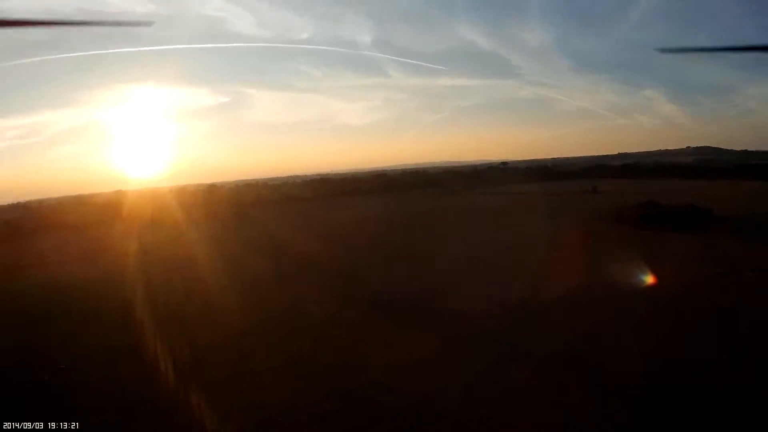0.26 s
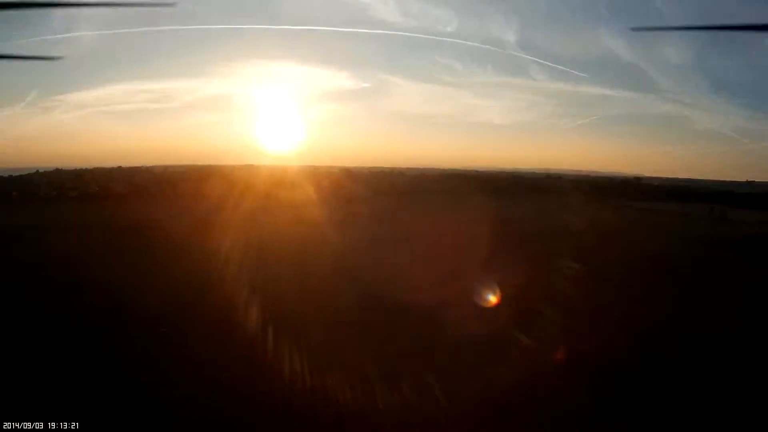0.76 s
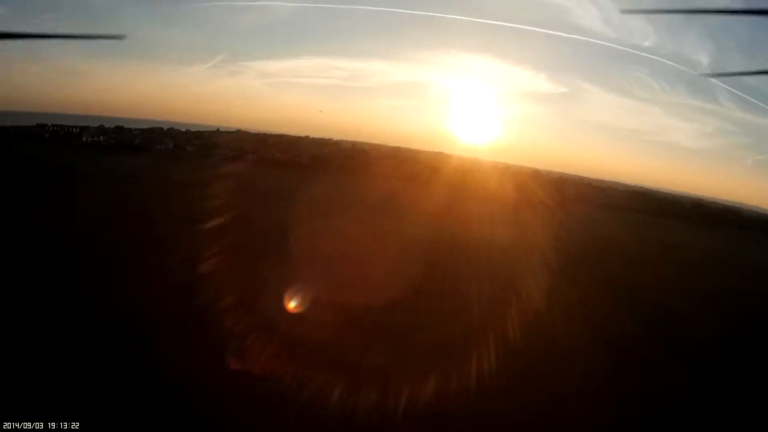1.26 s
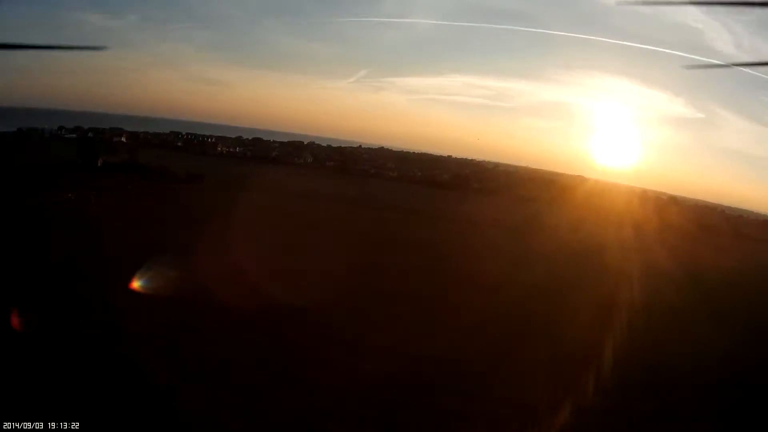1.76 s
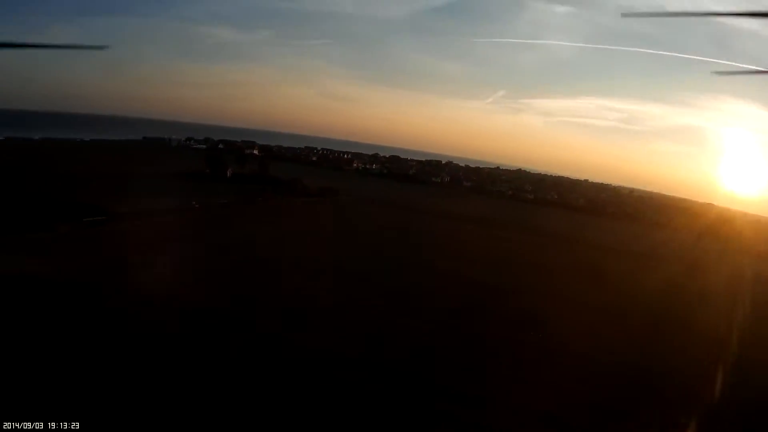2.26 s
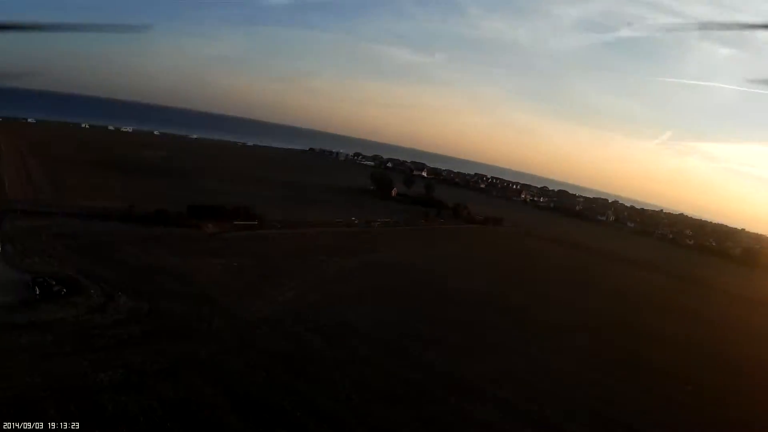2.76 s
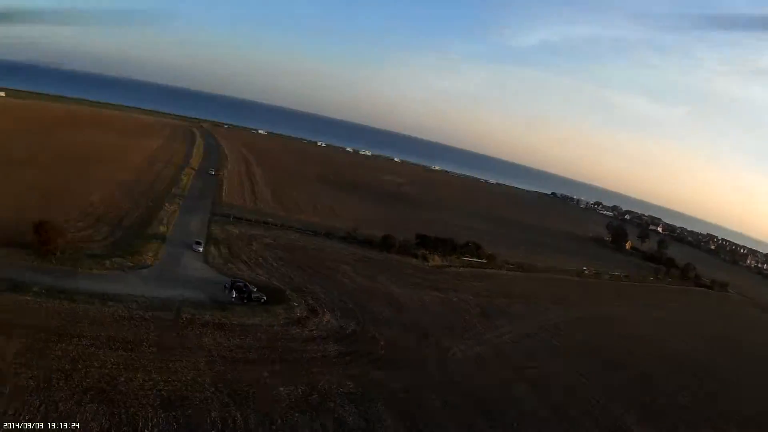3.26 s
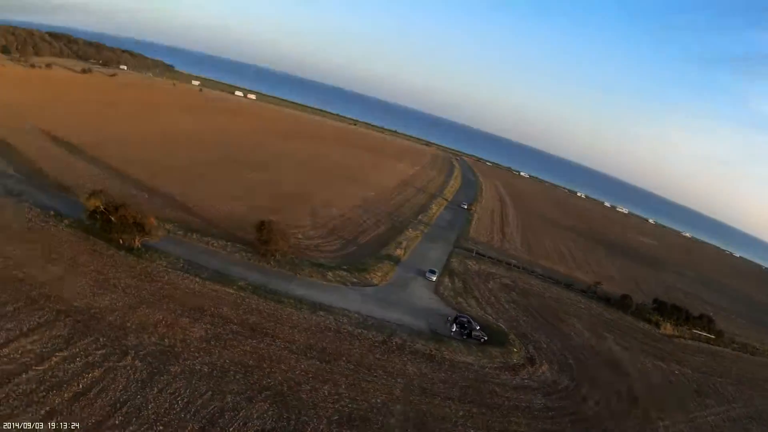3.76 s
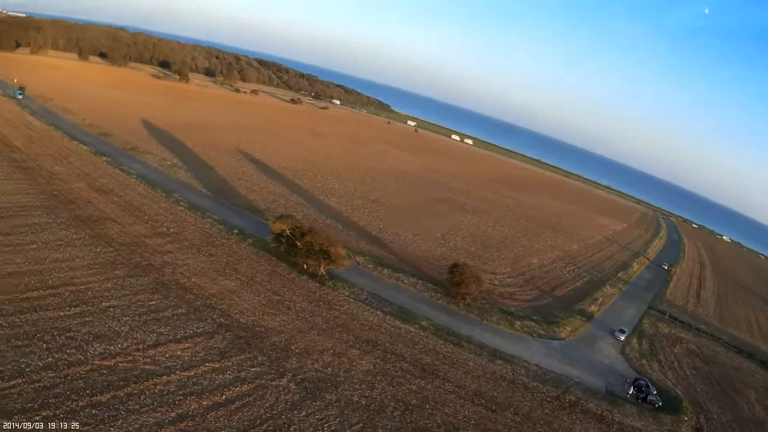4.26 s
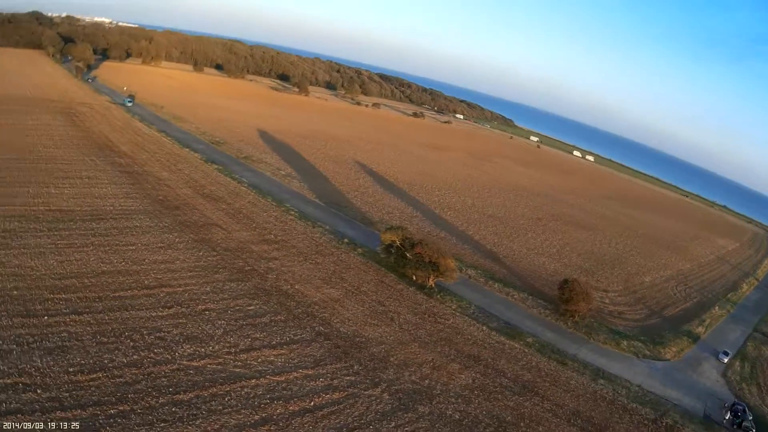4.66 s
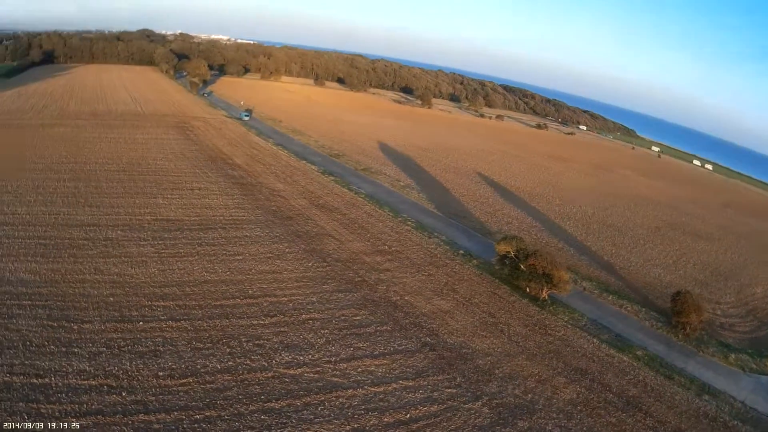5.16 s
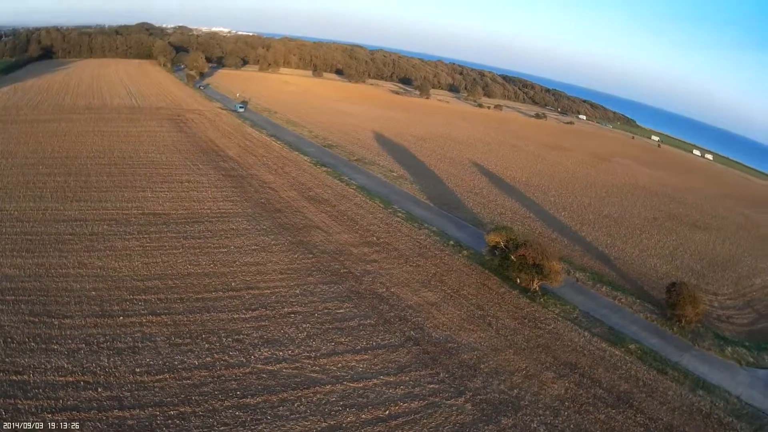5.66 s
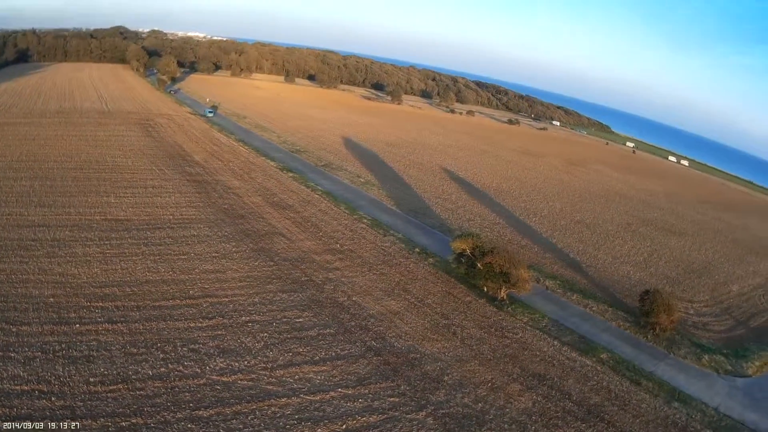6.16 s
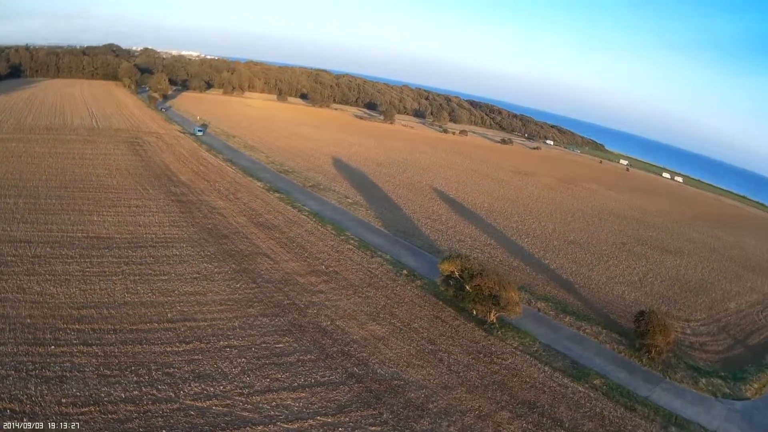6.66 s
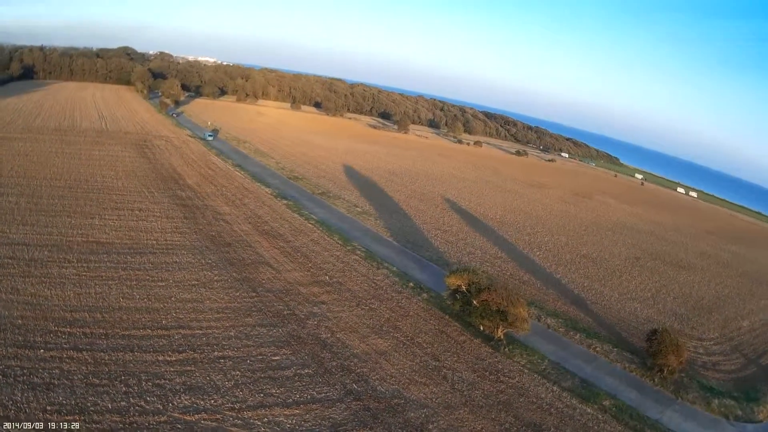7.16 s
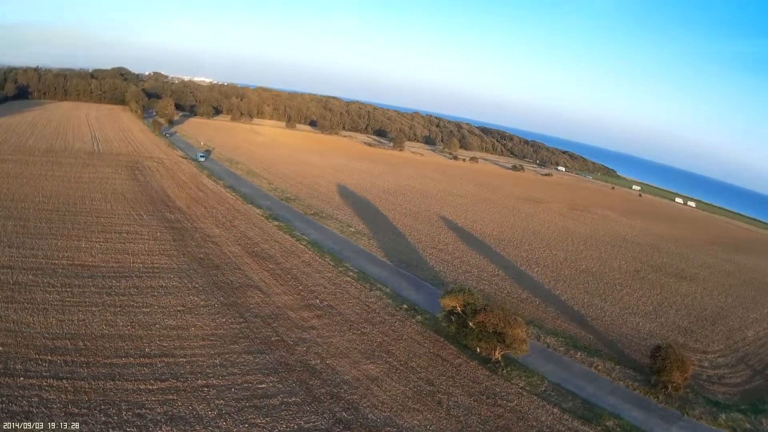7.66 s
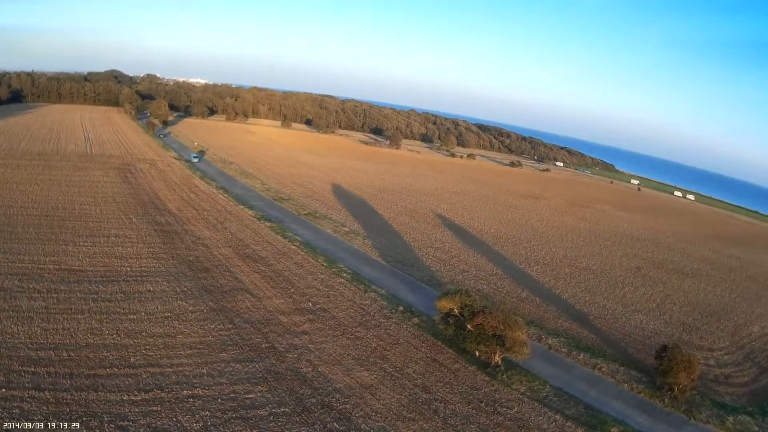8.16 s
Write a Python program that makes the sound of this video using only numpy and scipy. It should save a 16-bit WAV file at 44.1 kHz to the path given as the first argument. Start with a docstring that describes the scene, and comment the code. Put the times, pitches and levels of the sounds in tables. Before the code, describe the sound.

A small drone's propellers hum low and beat under a thin electric whine, harsh blade slapping first, then smoother, finally shaking hard and overloading the microphone.

```python
"""Over open fields, a small quadcopter banks; we hear it through the camera microphone on its frame.
Four motors run at slightly different speeds: tones locked to each shaft make a low propeller hum that
beats, and a magnetic whine near 4 kHz. Shaped noise makes the rushing air, the low buffeting and the hiss.
Short pulses make the blade slaps, the buzz and the ticks; thin whistles come and go.
Later on, the frame shakes hard once a revolution and overloads the microphone."""
import sys
import numpy as np
from scipy import signal
from scipy.fft import rfft, irfft
from scipy.io import wavfile

SR = 44100
rng = np.random.default_rng(int(sys.argv[2]) if len(sys.argv) > 2 else 0)


def wrap_up_sound(samples):
    """Save the sound to the file named by the first command line argument, as 16-bit audio."""
    columns = np.atleast_2d(samples).T
    # keep every value between -1 and 1, then stretch to whole-number steps
    tamed = np.clip(columns, -1, 1)
    steps = np.round(tamed * 32767).astype(np.int16)
    wavfile.write(sys.argv[1], SR, steps)


N = 370440
TIME = np.arange(N) / SR  # seconds

# set speeds of the two motors nearest the microphone: (time [s], shaft speed [turns per s])
SPEED_A = [(0.0, 90.0), (0.38, 94.7), (0.65, 88.8), (0.79, 95.3), (1.0, 91.3), (1.22, 90.9), (1.3, 95.0),
           (2.1, 97.3), (2.65, 103.7), (2.9, 104.1), (3.45, 96.3), (3.58, 100.3), (4.14, 102.4),
           (4.73, 94.4), (5.36, 100.7), (6.07, 90.5), (6.33, 93.2), (6.8, 90.6), (7.22, 94.3), (7.67, 94.0),
           (8.07, 88.2), (8.4, 90.5)]
SPEED_B = [(0.0, 84.1), (0.19, 81.1), (0.9, 79.3), (1.01, 81.6), (2.31, 88.0), (2.79, 87.6), (3.28, 93.2),
           (3.4, 97.5), (3.56, 94.2), (4.37, 91.7), (4.53, 96.6), (4.95, 92.1), (5.1, 94.2), (5.2, 85.1),
           (5.39, 84.3), (5.55, 87.7), (6.47, 93.3), (7.03, 86.3), (7.24, 89.7), (7.38, 86.4), (7.67, 88.0),
           (8.4, 86.1)]
# set speeds of the two far motors: (time [s], shaft speed [turns per s])
SPEED_C = [(0, 92.9), (.95, 90.8), (1.32, 78.5), (2.2, 89), (3.1, 90), (3.501, 93.4), (3.87, 90.9),
           (4.45, 98.7), (5.1, 98.85), (6.4, 90.26), (7.15, 90.9), (7.55, 98), (7.85, 93.3), (8.4, 94)]
SPEED_D = [(0, 95.7), (1.401, 96.6), (2.2, 91), (2.7, 94.7), (3.45, 96), (4.75, 105.3), (5.65, 99.6),
           (6.35, 104.9), (8.4, 100.3)]
# the speeds hunt around these settings: rate and filter width of the hunting
HUNT_HZ, HUNT_WIDTH_HZ = 5.5, 4.95
# typical swing of the shaft angle: a fixed part, and a part per unit of sway gain
HUNT_RAD, HUNT_SWAY_RAD = .025, .15

# base strength of the near motors: (time [s], whine [dB], propeller hum [dB])
LEVEL_A = [(0, -40, -16.5), (.65, -37, -16.5), (1.1, -40, -18), (1.6, -42, -16.5), (2.3, -31, -16),
           (3.25, -30, -15), (3.55, -38.5, -17), (4.7, -40.5, -20.5), (5.5, -42, -19.5), (6.2, -39, -20.5),
           (8.4, -39, -21.5)]
LEVEL_B = [(0, -45, -32), (1.6, -46, -32), (2.4, -57, -22.5), (3.8, -36, -19), (4.7, -43, -19),
           (5.25, -33.5, -27.5), (6.3, -39.5, -20.5), (6.75, -34.5, -31.5), (8.4, -37, -14.5)]
# propeller hum; two blades make the even multiples strong: (multiple of shaft speed, level [dB])
HUM = [(1, -9), (2, 1.5), (3, -18), (4, -9.5), (5, -24.5), (6, -20.5), (7, -34), (8, -32)]

# motor whine; 14 poles are switched 42 times a turn: (multiple of shaft speed, level [dB])
WHINE = [(36, -29), (40, -29), (42, 0.5), (44, -17)]
STEPS_PER_TURN = 42
FAR_WHINE_C_DB, FAR_WHINE_D_DB = -40, -42.5
# a whine grows louder as it passes this resonance of the frame
FRAME_HZ, FRAME_WIDTH_HZ, FRAME_DB = 3714, 330, 6.5

# stretches of disturbed air at the blades: (start [s], attack [s], hold [s], release [s], level [dB])
WAKES = [(0, .02, 3.42, 0.1, -2), (1.75, 0.48, 0.23, 0.42, -6.5), (3.44, 0.077, 0.53, 0.33, -13)]
# slap pulses and noise puffs at a reference shaft speed, and their change for each Hz above it
SLAP_SPEED_HZ = 100
PULSE_DB, PULSE_DB_PER_HZ = -30.5, 0.46
PUFF_DB, PUFF_DB_PER_HZ = -31, -0.13
# tone colours of the slap pulses and the puffs: (frequency [Hz], relative level [dB])
SLAP_COLOUR = [(400, 0), (800, -4), (1250, -1), (1700, 3), (2050, -0.5), (2450, -21), (3500, -27),
               (8000, -34)]
PUFF_COLOUR = [(400, -28), (900, -5), (1500, 1), (2100, 3), (2600, -5.5), (3500, -32), (8000, -42)]

# bouts of frame sway: (start [s], attack [s], hold [s], release [s], level [dB])
SWAYS = [(5.6, 0.34, 2.1, 0.14, -20), (6.14, 0.18, 0.67, 0.37, -8), (7.52, .16, 0.42, .45, -11)]
CALM_SWAY_DB = -25  # always present, under the bouts
# knocking of the frame: (multiple of shaft speed, level [dB])
KNOCK = [(2, -8.5), (3, -1), (4, -10), (5, -8.5), (6, -30.5), (7, -22)]
# knocking per unit of sway gain and of gust gain
SWAY_KNOCK_DB, GUST_KNOCK_DB = -17, -12.5

# bouts of chatter in the mount: (start [s], attack [s], hold [s], release [s], level [dB])
CHATTERS = [(0, .02, 1.8, .6, -33), (3.5, 0.1, 0.25, 1.4, -45), (5, .04, 0.011, .04, -32),
            (4.68, 0.026, 0.025, 0.066, -31.5), (5.0, 1, 2.5, 0.19, -38)]
BUZZ_DB = -48.5  # steady buzz under the bouts
# bouts of fine ticking in the mount: (start [s], attack [s], hold [s], release [s], level [dB])
TICKS = [(2.3, 0.47, .5, .8, -48), (4.9, 0.53, 2.58, 0.23, -46.5), (6.6, .25, .3, .3, -46)]

# hiss of the blade tips in calm air, and its rise per unit of wake gain and of gust gain
HISS_DB, HISS_WAKE_DB, HISS_GUST_DB = -31, 2.5, 2
# tone colour of the hiss: (frequency [Hz], relative level [dB])
HISS_COLOUR = [(200, -10), (900, -6.5), (2200, 0.5), (3200, -3.5), (3900, 5.5), (4500, 0.5), (5300, -8),
               (6700, -13.5), (7800, -10.5), (10500, -20), (13500, -22), (15500, -29)]
# resonances of the camera housing: (frequency [Hz], width [Hz], height [dB])
HOUSING = [(4600, 180, 3), (6010, 740, 4.5), (9870, 880, 7), (12000, 720, 5)]

# brief thin whistles above the whine: (middle [s], length [s], frequency [Hz], level [dB])
WHISTLES = [(.37, .22, 4580, -39), (.91, .23, 4570, -38), (2.07, .19, 4587, -41), (3.9, .3, 4600, -44),
            (5.39, .1, 4720, -39), (6.6, .74, 4620, -41), (7.03, .1, 4630, -36), (8.3, .3, 4607, -42)]

# steady airflow: (time [s], buffeting [dB], rush [dB])
AIR = [(0, -27.5, -29), (.8, -23, -24.5), (1.7, -20, -24.5), (2.5, -30, -31.5), (3.2, -44, -39.5),
       (4.35, -44, -55), (4.75, -35, -36), (5.9, -41, -29.5), (8.4, -46, -24.5)]
# gusts that build up and stop abruptly: (start [s], attack [s], hold [s], release [s], level [dB])
GUSTS = [(6.42, 0.29, 0.387, 0.098, 1), (7.53, 0.16, 0.62, .06, -7), (7.92, 0.414, 0.018, 0.038, -7.5)]
# brief blows of wind on the microphone: (start [s], attack [s], hold [s], release [s], level [dB])
BLOWS = [(.04, 0.097, 0.25, 0.17, -18.5), (7.2, 0.071, .04, .06, -22)]
# buffeting relative to the sway bouts, rush relative to the gusts
SWAY_BUFFET_DB, GUST_RUSH_DB = -10, -15
# tone colours of the buffeting and the rush: (frequency [Hz], relative level [dB])
BUFFET_COLOUR = [(10, 0), (25, -7), (60, 1.5), (130, 1), (240, -5.5), (400, -12.5), (800, -41), (2000, -60)]
RUSH_COLOUR = [(60, -12), (200, 11.5), (420, 10), (650, 4.5), (1000, 2), (1800, -4.5), (2600, -11.5),
               (5000, -21.5), (12000, -39.5)]

TOP_HZ = 15800  # the highest treble is cut above this


def propeller(turn, db):
    """Blades passing by push the air in a steady rhythm: a hum of tones locked to the shaft."""
    return undb(db) * tones(turn, HUM, waver_db=1.5, waver_rate=2.13)


def whine(turn, db, overtone_db):
    """Magnetic whine and its octave; the speed controller's quick corrections make it flutter."""
    whine_hz = STEPS_PER_TURN * speed_of(turn)
    lift_db = FRAME_DB / (1 + (2 * (whine_hz - FRAME_HZ) / FRAME_WIDTH_HZ) ** 2)
    fluttering = turn + .015 * walk(10) + .002 * walk(130)
    main = undb(lift_db) * tones(fluttering, WHINE, waver_db=0.27, waver_rate=11)
    octave_gain = undb(overtone_db + 2.0 * walk(6.4))
    octave = octave_gain * np.sqrt(2) * np.sin(2 * STEPS_PER_TURN * fluttering)
    return undb(db + 1.1 * walk(9.1)) * (main + octave)


def slap(turn):
    """In disturbed air each passing blade sends a pulse, stronger at speed, and a puff of noise."""
    faster_hz = speed_of(turn) - SLAP_SPEED_HZ
    pulse_db = PULSE_DB + PULSE_DB_PER_HZ * faster_hz
    puff_db = PUFF_DB + PUFF_DB_PER_HZ * faster_hz
    # two blades: two slaps per turn
    pulses = colour(knocks(2 * turn, scatter_db=3.0), SLAP_COLOUR)
    rough_noise = undb(2.0 * walk(220)) * rng.standard_normal(N)
    puffs = colour(gate(2 * turn, sharp=0.34) * rough_noise, PUFF_COLOUR)
    # patches of disturbed air make the slaps come in clusters
    clusters_db = 2.0 * walk(25)
    slaps = undb(pulse_db + clusters_db) * pulses + undb(puff_db + .5 * clusters_db) * puffs
    return swells(WAKES) * slaps


def shake(turn):
    """An unbalanced rotor sways the frame once a turn; knocking grows with the sway and the gusts."""
    knock_gain = undb(SWAY_KNOCK_DB) * swaying() + undb(GUST_KNOCK_DB) * swells(GUSTS)
    uneven = turn + 0.037 * walk(7.9)
    sway = swaying() * undb(1.0 * walk(29.0)) * np.sqrt(2) * np.cos(uneven)
    knocking = tones(uneven + 0.076 * walk(64), KNOCK, waver_db=2.5, waver_rate=44)
    return sway + knock_gain * knocking


def buzz(turn):
    """The mount chatters once a turn: taps and bursts of noise set three resonances ringing."""
    taps = unit(knocks(turn, scatter_db=3.5))
    push = 0.42 * taps + gate(turn, sharp=1.0) * rng.standard_normal(N)
    ringing = ring(push, 738, 320) + 0.89 * ring(push, 2076, 370) + 0.72 * ring(push, 2960, 720)
    return (undb(BUZZ_DB) + swells(CHATTERS)) * unit(ringing)


def crackle(turn):
    """Bright ticks in the mount once a turn, very uneven in size."""
    ticks = np.minimum(knocks(turn, scatter_db=8), undb(13))  # limit the largest
    bright = [(1500, -20), (5000, 1), (9000, 14), (13000, -1), (16000, 6)]  # Hz, dB
    return swells(TICKS) * colour(ticks, bright)


def hiss(turn_a, turn_b):
    """Swirling air at the blade tips, chopped by the rotation; rough air lifts the hiss."""
    db = HISS_DB + HISS_WAKE_DB * swells(WAKES) + HISS_GUST_DB * swells(GUSTS)
    chop = gate(2 * turn_a, sharp=1.0) + gate(turn_a, sharp=0.48) + gate(turn_b, sharp=0.1)
    rough_noise = undb(1.2 * walk(200)) * rng.standard_normal(N)
    return undb(db) * colour(chop * rough_noise, HISS_COLOUR, HOUSING)


def whistles():
    """Thin tones with a wavering pitch and strength that swell and die away now and then."""
    out = np.zeros(N)
    for middle, length, hz, db in WHISTLES:
        swell = np.exp(-(2 * (TIME - middle) / length) ** 4)
        tone = np.sqrt(2) * np.sin(angle(hz + 25 * walk(54.7)))
        out += undb(db + 3.0 * walk(40)) * swell * tone
    return out


def air(turn):
    """Low buffeting on the microphone, and a gusty rush in the wash of the nearest propeller."""
    buffet_db, rush_db = curves(AIR)
    buffet_gain = undb(buffet_db) + undb(SWAY_BUFFET_DB) * swells(SWAYS) + swells(BLOWS)
    rush_gain = undb(rush_db) + undb(GUST_RUSH_DB) * swells(GUSTS)
    buffet = undb(1.0 * walk(25)) * colour(rng.standard_normal(N), BUFFET_COLOUR)
    # large eddies swell the rush, small ones break it into grains
    eddy_gain = undb(2.0 * walk(8) + 2.7 * walk(410))
    eddies = eddy_gain * gate(2 * turn, sharp=0.23) * rng.standard_normal(N)
    return buffet_gain * buffet + rush_gain * colour(eddies, RUSH_COLOUR)


def shaft(speed):
    """Angle of a shaft that hunts around its set speed, more so when the frame sways."""
    hz, = curves(speed)
    hunting = unit(ring(rng.standard_normal(N), HUNT_HZ, HUNT_WIDTH_HZ))
    return angle(hz) + (HUNT_RAD + HUNT_SWAY_RAD * swaying()) * hunting


def speed_of(turn):
    """Shaft speed in turns per second from its angle."""
    return np.gradient(turn) * SR / (2 * np.pi)


def swaying():
    """How strongly the frame sways, as a gain."""
    return undb(CALM_SWAY_DB) + swells(SWAYS)


def swells(rows):
    """Summed gain of events that each rise, hold and fall."""
    total = 0
    for start, attack, hold, release, db in rows:
        rise = (TIME - start) / attack
        fall = 1 - (TIME - start - attack - hold) / release
        total = total + undb(db) * np.clip(np.minimum(rise, fall), 0, 1)
    return total


def tones(turn, orders, waver_db, waver_rate):
    """Tones locked to a shaft, each wavering in strength; a steady one at 0 dB has rms 1."""
    total = 0
    for multiple, db in orders:
        gain = undb(db + waver_db * walk(waver_rate))
        total = total + gain * np.sin(round(multiple) * turn)
    # the minus sign makes every tone start downwards
    return -np.sqrt(2) * total


def gate(turn, sharp):
    """One smooth burst per cycle; rms 1."""
    return unit(np.exp(sharp * np.cos(turn)))


def knocks(turn, scatter_db):
    """One single-sample pulse per cycle, uneven in size."""
    new_cycle = np.diff(np.floor(turn / (2 * np.pi)), prepend=0)
    return new_cycle * undb(scatter_db * walk(84))


def angle(hz):
    """Angle in radians that builds up from a speed in cycles per second."""
    return 2 * np.pi * np.cumsum(hz) / SR


def ring(x, hz, width_hz):
    """A resonance with steep sides: the same peak filter (of this width) used twice."""
    b, a = signal.iirpeak(hz, hz / width_hz, fs=SR)
    once = signal.lfilter(b, a, x)
    return signal.lfilter(b, a, once)


def colour(x, points, peaks=()):
    """Shape a sound by a spectrum and a few resonant humps; rms 1."""
    f = np.arange(N // 2 + 1) * SR / N + 1  # 1 Hz added to avoid log(0)
    hz, db = np.transpose(points)
    shape_db = np.interp(np.log(f), np.log(hz), db)
    for centre, width, height_db in peaks:
        shape_db = shape_db + height_db / (1 + (2 * (f - centre) / width) ** 2)
    return unit(irfft(rfft(x) * undb(shape_db), N))


def walk(rate):
    """Smooth random wandering, rms 1; movements faster than about this rate in Hz are weakened."""
    f = np.arange(N // 2 + 1) * SR / N
    smooth = rfft(rng.standard_normal(N)) / (1 + (f / rate) ** 2) ** 2
    return unit(irfft(smooth, N))


def curves(table):
    """The columns of a table, joined by straight lines in time."""
    s, *columns = np.transpose(table)
    return [np.interp(TIME, s, c) for c in columns]


def unit(x):
    """Scale to rms 1."""
    return x / np.sqrt(np.mean(x ** 2))


def undb(db):
    """Turn decibels into a gain."""
    return 10 ** (np.asarray(db) / 20)


def scene():
    """Four rotors, their hum and whine, with air and frame noise around them."""
    a, b, c, d = (shaft(speed) for speed in (SPEED_A, SPEED_B, SPEED_C, SPEED_D))
    whine_a_db, hum_a_db = curves(LEVEL_A)
    whine_b_db, hum_b_db = curves(LEVEL_B)
    # the near propellers beat: they weaken each other when equally strong but out of step
    near_hum = propeller(a, hum_a_db) + propeller(b, hum_b_db)
    far_hum = propeller(c, db=-38) + propeller(d, db=-33.5)
    near_whine = whine(a, whine_a_db, overtone_db=-24.0) + whine(b, whine_b_db, overtone_db=-16)
    far_whine = whine(c, FAR_WHINE_C_DB, overtone_db=-19.5) + whine(d, FAR_WHINE_D_DB, overtone_db=-24.0)
    motors = near_hum + far_hum + near_whine + far_whine
    frame = shake(b) + buzz(b) + crackle(b)
    mix = motors + slap(a) + frame + hiss(a, b) + whistles() + air(a)
    return mix[None]  # one channel


def record(dry):
    """The microphone overloads with flattened tops; then the highest treble is cut."""
    ceiling = .71
    clipped = dry / (1 + (dry / ceiling) ** 12) ** (1 / 12)
    treble_cut = signal.ellip(10, .1, 80, TOP_HZ, fs=SR, output="sos")
    return signal.sosfilt(treble_cut, clipped)


dry = scene()
out = record(dry)
wrap_up_sound(out)
```